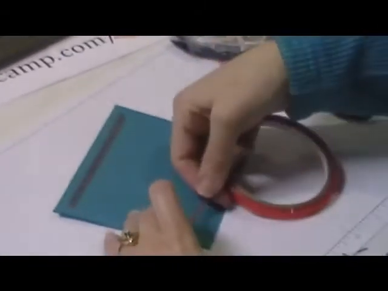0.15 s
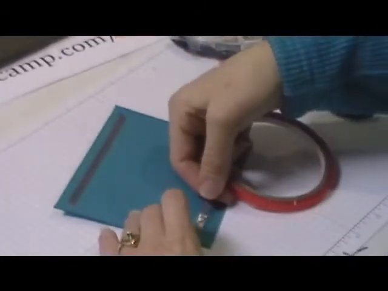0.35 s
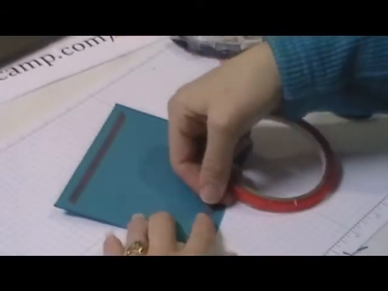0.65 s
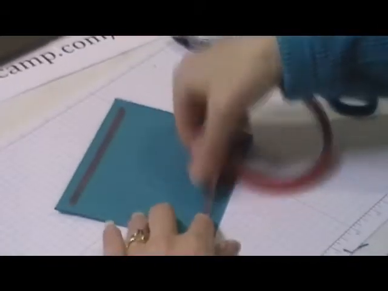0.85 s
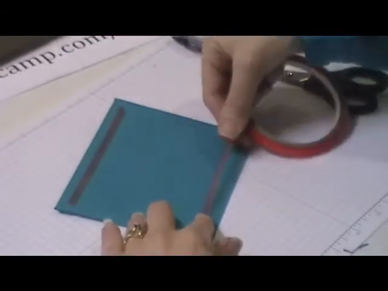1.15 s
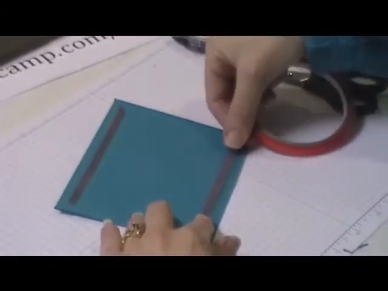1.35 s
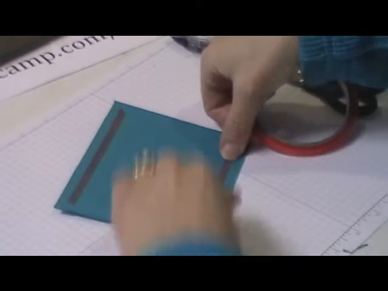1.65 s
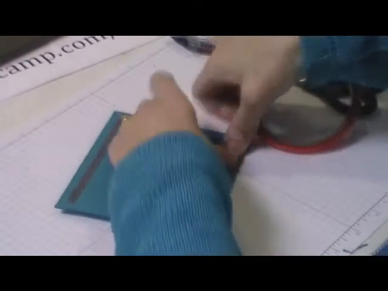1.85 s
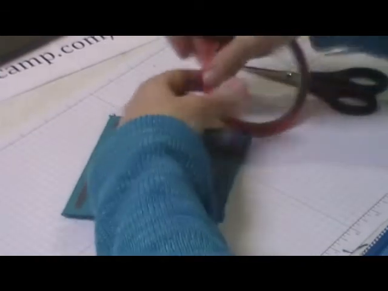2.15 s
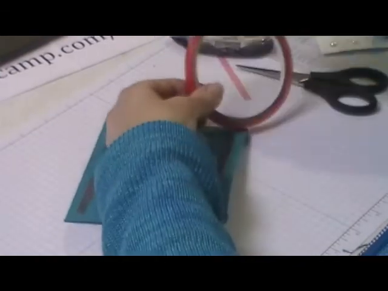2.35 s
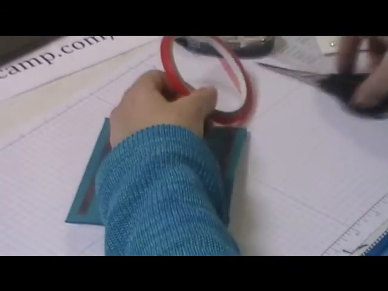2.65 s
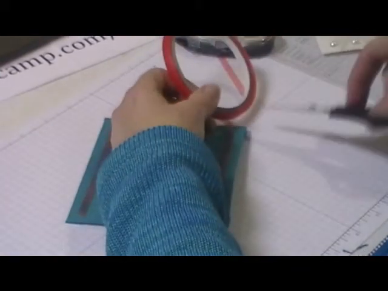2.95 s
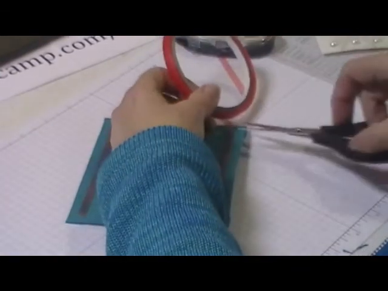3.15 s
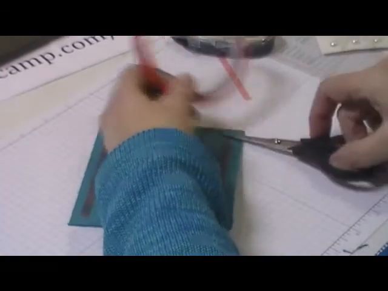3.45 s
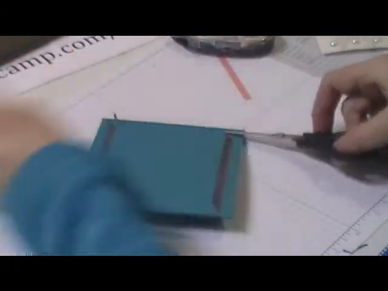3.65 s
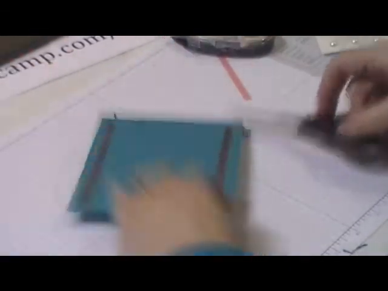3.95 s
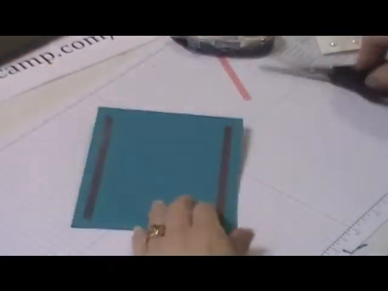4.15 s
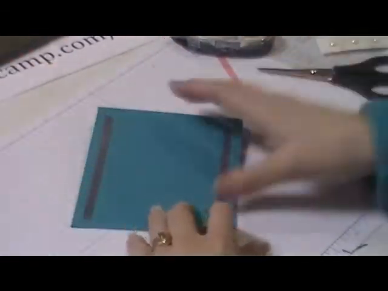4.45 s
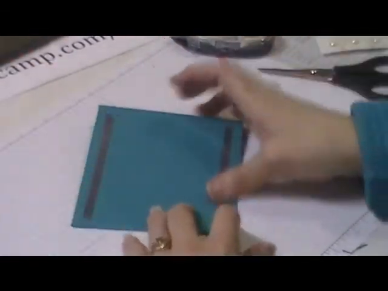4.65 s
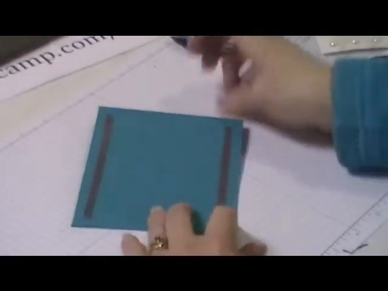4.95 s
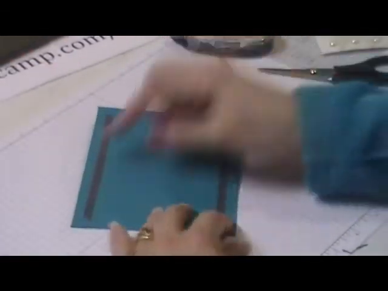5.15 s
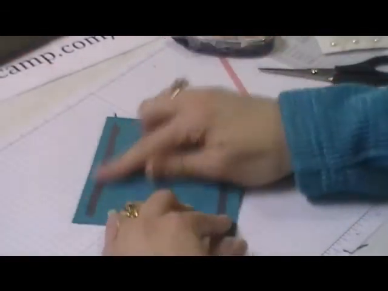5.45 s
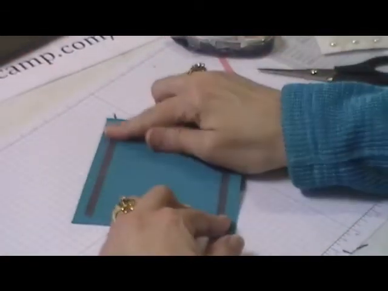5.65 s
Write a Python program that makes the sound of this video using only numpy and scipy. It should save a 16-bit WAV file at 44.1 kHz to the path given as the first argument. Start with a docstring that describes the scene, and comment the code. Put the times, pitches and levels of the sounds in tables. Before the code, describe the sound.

Hands work sticky tape on a card at a table: knocks, small snips, papery rubs, then a loud clatter as scissors are set down.

```python
"""Craft table, hands and adhesive strip

Place: a bare room with humming lamps, a faint whine and air hiss; hands lay adhesive strip on a card at a table.
Near the two capsules, a little to the right: roll and scissors knock damped table modes, and soft presses
strike the same modes. Strip and blades tick and scuff as noise bursts; fingers and sleeves swish and drag as
flickering noise with crackles. Further off, the room answers with decaying noise echoes.
The microphone notches out three narrow bands; the treble ends in a steep top cut."""
import sys
import numpy as np
from scipy import signal
from scipy.io import wavfile

SR = 44100
rng = np.random.default_rng(int(sys.argv[2]) if len(sys.argv) > 2 else 0)


def level_to_linear(level):
    """Convert decibel levels to linear amplitude factors, elementwise."""
    exponent = np.asarray(level, float) / 20
    return 10 ** exponent


def dump_mix(stems):
    """Bounce the given channels to the path in sys.argv[1] as a 16-bit WAV at rate SR."""
    frames = np.atleast_2d(stems).T  # one column per channel
    limited = np.clip(frames, -1, 1)  # hard clip at full scale
    pcm = np.round(limited * 32767).astype(np.int16)
    wavfile.write(sys.argv[1], SR, pcm)


N = 255780
BAND_EDGES_HZ = 30 * 2 ** np.arange(0, 9.1, .5)
RING_MIDDLE_HZ = 600


def rms_one(x):
    """Scale to an rms of 1."""
    return x / np.sqrt(np.mean(x ** 2) + 1e-20)


def at_hz(points, hz, column=1):
    """Read a table column at a frequency, straight between points on a log frequency axis."""
    table = np.array(points)
    return np.interp(np.log(hz), np.log(table[:, 0]), table[:, column])


def bands():
    """Half-octave band-passes with their centres."""
    for low, high in zip(BAND_EDGES_HZ, BAND_EDGES_HZ[1:]):
        yield np.sqrt(low * high), signal.butter(2, [low, high], "band", fs=SR, output="sos")


def drift(rate_hz):
    """Random wander of rms 1: noise through two equal low-pass poles, computed every 40 samples."""
    r = np.exp(-80 * np.pi * rate_hz / SR)
    noise = rng.standard_normal(N // 40 + 2002)
    slow = rms_one(signal.lfilter([1], [1, -2 * r, r * r], noise)[2000:])
    return np.interp(np.arange(N) / 40, np.arange(len(slow)), slow)


def pair(mid, side, alike):
    """Left and right from two signals with a given likeness."""
    alike = np.clip(alike, 0, 1)
    return np.sqrt((1 + alike) / 2) * mid + np.sqrt((1 - alike) / 2) * side * np.array([[1], [-1]])


def sides(pan_db):
    """Left and right gains; positive leans left."""
    return level_to_linear(np.multiply.outer([.5, -.5], pan_db))


def damped_resonance(hz, t60, blows):
    """A two-pole resonator: each impulse becomes a sine that dies 60 dB in t60 seconds."""
    r, w = level_to_linear(-60 / (t60 * SR)), 2 * np.pi * hz / SR
    return signal.lfilter([0, np.sin(w)], [1, -2 * r * np.cos(w), r * r], blows)


def burst(hz, spread, rise_ms, decay_ms):
    """A puff of noise around one pitch, the top of its envelope 60 ms in; peak 1."""
    ms = np.arange(4500) / SR * 1000 - 60
    rise = np.exp(-(ms / max(rise_ms, .05)) ** 2)
    decay = np.exp(-np.abs(ms) / max(decay_ms, .15))
    shape = np.where(ms < 0, rise, decay)
    first_touch = np.arange(len(ms)) == np.argmax(shape)
    grains = rng.standard_normal(len(ms)) + 2.5 / (1 + rise_ms) * first_touch   # first touch is the hardest
    spread = max(spread, 1.03)
    edges = np.clip([hz / spread, hz * spread], 300, 18000)
    puff = signal.sosfilt(signal.butter(2, edges, "band", fs=SR, output="sos"), grains * shape)
    return puff / np.abs(puff).max()


def add(out, s, sound):
    """Mix a burst in with the top of its envelope at s seconds."""
    at = round((s - .06) * SR)
    out[..., max(at, 0):at + sound.shape[-1]] += sound[..., max(-at, 0):N - at]


# room tone and hiss by frequency: f/Hz, relative level/dB per Hz
AIR_SPECTRUM = [(18, -38), (30, -18), (118, -3), (359, -6), (442, -10), (1340, -18), (1700, -20),
                (2500, -16.5), (2700, -20.5), (7030, -30), (11500, -42), (14500, -18)]
# how alike the two capsules hear the air: f/Hz, left-right likeness
AIR_LIKENESS = [(60, 0.092), (180, 0.019), (540, 0.022), (1610, 0.25), (4800, 0.93), (14400, 0.17)]
# lamp hum tones: f/Hz, rms level/dB, lead of the left capsule/turns
LAMP_HUM = [(45, -78, 0.13), (115.4, -72.5, 0.14), (256, -77, 0.3), (338, -74.5, 0.27), (620, -79, 0.73),
            (820, -78.5, 0.3), (1200, -83, 0.34), (1640, -81, 0.087)]
AIR_DB = -65.5
WHINE_HZ, WHINE_PEAK_DB = 11348, -93


def air():
    """Room tone and microphone hiss as banded noise, with wavering sines for the lamps and one steady whine."""
    white, hiss = rng.standard_normal((2, 2, N)), 0
    for k, (hz, sos) in enumerate(bands()):
        mid, side = signal.sosfilt(sos, white[k % 2])
        level = level_to_linear(at_hz(AIR_SPECTRUM, hz) + 0.25 * drift(3.7))
        hiss = hiss + level * pair(mid, side, at_hz(AIR_LIKENESS, hz))
    t, hum = np.arange(N) / SR, 0
    for hz, level_db, lead in LAMP_HUM:
        turns = hz * t + rng.random() + np.array([[lead], [0]])
        hum = hum + level_to_linear(level_db + 1.0 * drift(4.1)) * np.sqrt(2) * np.sin(2 * np.pi * turns)
    whine = level_to_linear(WHINE_PEAK_DB) * np.sin(2 * np.pi * WHINE_HZ * t)
    return level_to_linear(AIR_DB) * rms_one(hiss) + hum + whine


def friction(spectrum, tilt_db, patchy_db, grain_db):
    """Dense grains of uneven size through flickering bands; brought to rms near 1 before the tilt about 6 kHz."""
    grains = rng.standard_normal((2, N)) * level_to_linear(grain_db * drift(96))
    out, power, together = 0, 0, drift(16.0)
    for k, (hz, sos) in enumerate(bands()):
        if spectrum[0][0] < hz < spectrum[-1][0]:
            gain = level_to_linear(at_hz(spectrum, hz) + patchy_db * (together + drift(10.0)))
            band = gain * signal.sosfilt(sos, grains[k % 2])
            out = out + band * level_to_linear(tilt_db * np.log2(hz / 6000))
            power = power + np.mean(band ** 2)
    return out / np.sqrt(power)


CRACKLES_PER_S, CRACKLE_SPREAD_DB = 60, 3.5


def crackle():
    """Sparse snaps of paper and glue, each dying 60 dB within seven cycles of one of eight pitches."""
    sizes_db = CRACKLE_SPREAD_DB * np.minimum(rng.exponential(1, N), 3)
    snaps_at = rng.random(N) < CRACKLES_PER_S / SR
    sizes = level_to_linear(sizes_db) * snaps_at
    dealt, out = rng.integers(0, 8, N), 0
    for k, hz in enumerate(np.geomspace(800, 5000, num=8)):
        out = out + damped_resonance(hz, 7.0 / hz, sizes * (dealt == k) + 1e-18)
    return out


# skin and wool sliding: t/s, swish on paper level/dB, drag through the table level/dB
RUBBING = [(0.0, -59, -37.5), (0.3, -65, -64.5), (0.52, -72, -70.5), (0.97, -54, -57), (1.24, -58, -65.5),
           (1.322, -73.5, -64.5), (1.58, -70, -72), (1.71, -54.5, -50), (2.23, -57, -58.5), (2.4, -72, -69),
           (2.73, -56.5, -60), (3.0, -78.5, -68.5), (3.27, -76.5, -76), (3.33, -59, -61),
           (3.47, -53.5, -54.5), (3.56, -59.5, -58.5), (3.84, -62, -60.5), (4.05, -62, -50.5),
           (4.38, -55, -34), (4.54, -67, -53), (4.728, -52, -59.5), (4.899, -50.5, -52), (5.12, -59.5, -60),
           (5.389, -63, -60.5), (5.617, -47.5, -54), (5.8, -67, -59.5)]
# colour of the swish on paper: f/Hz, relative level/dB per Hz
SWISH_SPECTRUM = [(470, -82), (800, -25.5), (1350, -14), (2500, -9.5), (4080, -8.5), (5570, -10),
                  (6350, -7.5), (11300, -8), (14000, -3)]
# colour of the drag on the table: f/Hz, relative level/dB per Hz
DRAG_SPECTRUM = [(47, -63), (80, -31), (108, -7.5), (308, 4.5), (343, 3.5), (1930, -5.5), (2580, -13.5),
                 (3000, -11), (3900, -49), (6600, -120)]
SWISH_TILT_DB, TILT_PER_DB = -3.5, 0.3805   # dB per octave; brighter as the swish outweighs the drag
CRACKLE_DB = 4.5   # against the drag
JOLT_SWISH_DB, JOLT_DRAG_DB, JOLT_TILT_DB = -26.5, -12.5, -10   # dB against the ring (two), dB per octave
JOLT_REACH_OCTAVES = 1.77   # bright knocks shake out more swish


def rubbing():
    """Fingers and sleeves swish on paper, drag and crackle on the table; knocks jolt loose things into a slide."""
    s, *columns = np.transpose(RUBBING)
    swish_db, drag_db = [np.interp(np.arange(N) / SR, s, c) for c in columns]
    tilt_db = SWISH_TILT_DB + TILT_PER_DB * (swish_db - drag_db)
    swish = level_to_linear(swish_db) * friction(SWISH_SPECTRUM, tilt_db, patchy_db=1.3, grain_db=1.8)
    shaken = friction(SWISH_SPECTRUM, JOLT_TILT_DB, patchy_db=1.2, grain_db=3.0)
    shaken = level_to_linear(JOLT_SWISH_DB) * jolt(JOLT_REACH_OCTAVES) * shaken
    drag_level = np.hypot(level_to_linear(drag_db), level_to_linear(JOLT_DRAG_DB) * jolt(0))
    drag = drag_level * friction(DRAG_SPECTRUM, 0, patchy_db=3.0, grain_db=0.0)
    return swish + level_to_linear(drag_db + CRACKLE_DB) * crackle() + shaken + drag


# the bare room's echoes: f/Hz, t60/s, level/dB, left-right likeness
ROOM = [(71, 1, -21, 0.1), (130, 0.39, -5, 1), (270, 0.58, -3, 0.9), (1100, 0.55, -3.5, 0.46),
        (2000, 0.77, -7, 0.26), (3110, 0.54, -6, 0.87), (9000, 0.22, -11, 1)]


def room(x):
    """Echoes as noise that sets in after 3 ms, thickens over 4.8 ms and dies band by band."""
    t = np.arange(SR) / SR
    white, echoes = rng.standard_normal((2, 2, SR)), 0
    for k, (hz, sos) in enumerate(bands()):
        t60 = at_hz(ROOM, hz, column=1)
        mid, side = signal.sosfilt(sos, white[k % 2]) * level_to_linear(-60 * t / t60) / np.sqrt(t60 * SR / 14)
        echoes = echoes + level_to_linear(at_hz(ROOM, hz, column=2)) * pair(mid, side, at_hz(ROOM, hz, column=3))
    echoes = echoes * np.clip((t - .003) / 0.0048, 0, 1)
    return signal.fftconvolve(x[None], echoes, axes=1)[:, :N]


# roll and scissors striking the table, levels before colouring:
# t/s, click level/dB (2 dB is added), ring level/dB at the ring middle, ring tilt/dB per octave
KNOCKS = [(0.0054, -16.5, -32, 9.5), (0.053, -19, -62, 17.5), (0.469, -46, -61.5, 6.5),
          (0.6812, -42, -61, 3), (0.88, -28, -42, -7), (0.8836, -12.5, -31, 5), (0.905, -29, -41.5, 1),
          (0.915, -36, -39, -0.5), (0.9454, -35, -31, 0.5), (0.9566, -41, -47, -4),
          (0.9803, -22.5, -34.5, 4), (1.457, -61, -60, -2), (1.534, -46, -46.5, -2), (1.74, -25, -41, 5),
          (1.75, -50, -45, 6.5), (1.7989, -24.5, -52, -10), (1.9024, -45, -60, 7), (1.933, -47, -47.5, 1),
          (2.0692, -42, -47.5, -4), (2.144, -45, -48, -2), (2.3166, -56, -40, 0), (2.5648, -25.5, -32, 0),
          (2.578, -31, -28.5, 2.5), (2.588, -43, -31.5, 2.5), (2.594, -52, -32.5, 0.5),
          (2.599, -46, -41, 4), (2.6057, -48, -32.5, -4), (2.616, -48, -38, 5), (2.6935, -34, -31, -1),
          (2.706, -46, -33.5, -4), (2.7373, -40, -36.5, 4.5), (3.463, -43, -41.5, 4),
          (3.4977, -46, -58, 10.5), (3.6098, -49, -63.5, 14.5), (3.801, -49, -31.5, 0.5),
          (3.9603, -35, -38, 4), (3.9635, -38, -39, -0.5), (3.97, -47, -41, 5), (4.025, -50, -44.5, 7.5),
          (4.047, -39, -37.5, -2), (4.057, -34, -37.5, 2.5), (4.0603, -25.5, -42, 11.5),
          (4.083, -50, -42, -3), (4.2219, -13, -30, 7), (4.228, -32.5, -27, 6.5), (4.2407, -12, -26, 9),
          (4.2455, -30, -41, -4), (4.249, -25, -32, 4), (4.26, -12.5, -24, 3.5), (4.268, -29.5, -22.5, -2),
          (4.2742, -31.5, -28, 4.5), (4.284, -36, -29, -1.5), (4.298, -24, -28.5, 4.5),
          (4.313, -33, -29, 2), (4.375, -40, -25.5, 2.5), (4.386, -43, -28.5, -1.5), (5.167, -34.5, -51, 9),
          (5.2916, -30.5, -62.5, 12)]
# colour of plastic and steel edges: f/Hz, level/dB per Hz (half of it is applied)
CLICK_SPECTRUM = [(710, -43.5), (1200, 9.5), (4910, 5), (5550, -12), (6680, 6.5), (8910, -2.5), (12900, -2),
                  (14000, -59)]


def clicks():
    """The hard edge of each blow: noise decaying in half a millisecond, in the colour of plastic and steel."""
    out = np.full(N, 1e-18)
    for s, peak_db, *_ in KNOCKS:
        add(out, s, level_to_linear(peak_db + 2.0) * burst(5500, spread=2.05, rise_ms=0.026, decay_ms=0.51))
    return sum(level_to_linear(.5 * at_hz(CLICK_SPECTRUM, hz)) * signal.sosfilt(sos, out)
               for hz, sos in bands() if hz > 1000)


# modes of the table top: f/Hz, relative level/dB, t60/s (15 ms at least is played)
TABLE_TOP = [(98.5, 1, 0.023), (115.6, -4, 0.08), (158, -13, 0.059), (223, -1.5, 0.059), (286.5, -14, 0.15),
             (325.5, -7, 0.13), (381, -2.5, 0.059), (462.7, -5, 0.076), (568, -11, 0.053), (629, -6, 0.068),
             (700, -11, 0.067), (824, -3, 0.039), (936.4, -5, 0.062), (1047, -4, 0.032),
             (1152, -1.5, 0.023), (1390, -3, 0.014), (1526, -18, 0.012), (1723, -6, 0.032),
             (1920, -4.5, 0.023), (2010, -8.5, 0.011), (2680, -5, 0.0083), (3080, -4, 0.014),
             (3484, -13.5, 0.034), (3966, -7, 0.016), (4260, -9, 0.013)]
KNOCK_SPREAD_CYCLES, PRESS_SPREAD_S = 1.1, .022
KNOCK_BEND_DB, PRESS_BEND_DB = 2.5, 2.5   # loss per squared octave away from the middle
MODE_LEAN_DB = 3.5   # each ring of the wide table top leans left or right


def table_top():
    """Each blow strikes every mode afresh: a knock nearly at once, a press smeared over its soft contact."""
    rows = np.vstack([np.delete(KNOCKS, 1, axis=1), touches()])   # t/s, ring level/dB, tilt/dB per octave
    soft, out = np.arange(len(rows)) >= len(KNOCKS), np.zeros((2, N))
    scatter_db = rng.normal(0, 1.5, (len(rows), len(TABLE_TOP)))
    lag = rng.random(scatter_db.shape)
    signs = rng.choice([-1, 1], scatter_db.shape)
    lean = sides(rng.normal(0, MODE_LEAN_DB, scatter_db.shape))
    for k, (hz, level_db, t60) in enumerate(TABLE_TOP):
        blows = np.full((2, N), 1e-18)
        contact_s = np.where(soft, PRESS_SPREAD_S, KNOCK_SPREAD_CYCLES / hz)
        at = ((rows[:, 0] + lag[:, k] * contact_s) * SR).astype(int)
        octaves = np.log2(hz / RING_MIDDLE_HZ)
        bend_db = np.where(soft, PRESS_BEND_DB, KNOCK_BEND_DB) * octaves ** 2
        strength_db = rows[:, 1] + rows[:, 2] * octaves - bend_db
        blows[:, at] = lean[:, :, k] * signs[:, k] * level_to_linear(strength_db + level_db + scatter_db[:, k])
        out += damped_resonance(hz, max(t60, .015), blows)
    return out


def jolt(octaves):
    """Envelope dying 60 dB in 0.45 s after each knock, by the strength of its ring that far above the middle."""
    kicks = np.full(N, 1e-18)
    for s, _, ring_db, tilt_db in KNOCKS:
        kicks[round(s * SR)] = level_to_linear(2 * (ring_db + tilt_db * octaves))   # power
    return np.sqrt(signal.lfilter([1], [1, -level_to_linear(-120 / (0.45 * SR))], kicks))


# blows that set one resonance of table, roll or handle ringing above the rest:
# t/s, f/Hz, level/dB before rise and decay, t60/s
HOLLOW_RINGS = [(.02, 398, -33.5, 0.2), (.888, 329, -32.5, 0.23), (0.906, 950, -33, 0.16),
                (0.9465, 1003, -32.5, .1), (.955, 746, -38, 0.076), (0.984, 326, -38, 0.1),
                (1.172, 820, -48.5, 0.12), (1.534, 801.4, -36.5, 0.044), (2.582, 948, -28.5, 0.16),
                (2.606, 200, -36.5, 0.097), (2.632, 320, -31, 0.16), (2.735, 319.7, -31.5, 0.17),
                (2.79, 284, -32, .1), (3.459, 124.5, -45, 0.16), (3.801, 1260, -30.5, 0.039),
                (3.801, 153.6, -32, 0.17), (3.96, 1048, -31, 0.079), (4.223, 1053, -21, 0.047),
                (4.262, 213, -27.5, 0.16), (4.272, 650, -21, 0.067), (4.314, 319, -29, 0.17),
                (4.376, 996, -20.5, 0.043), (4.388, 292, -23.5, 0.088), (4.452, 320.6, -30.5, 0.14),
                (4.763, 219, -39.5, 0.14), (4.963, 124.9, -35.5, 0.21), (4.965, 407, -36, 0.064),
                (5.005, 260, -37.5, 0.092), (5.518, 132.6, -36.5, 0.31), (5.553, 207.5, -34, 0.15),
                (5.64, 209.9, -41.5, 0.26), (5.79, 208, -36, 0.089)]
HOLLOW_RISE_CYCLES = 0.57


def hollow_rings():
    """One damped tone per blow, swelling over the contact."""
    out, t = np.zeros(N + SR), np.arange(SR // 2) / SR
    for (s, hz, level_db, t60), sign in zip(HOLLOW_RINGS, rng.choice([-1, 1], len(HOLLOW_RINGS))):
        rise = 1 - np.exp(-t * hz / HOLLOW_RISE_CYCLES)
        decay = level_to_linear(level_db - 60 * t / t60)
        at = round(s * SR)
        out[at:at + len(t)] += sign * rise * decay * np.sin(2 * np.pi * hz * t)
    return out[:N]


# hands pressing and objects settling, runs of touches too soft to click:
# t/s, length/s, first touch level/dB at the ring middle, tilt/dB per octave, loss/dB per touch
PRESSES = [(0.03, 0.099, -34, 0, 12), (0.769, 0.021, -49, 0, 2), (0.884, 0.1, -39.5, 1, 0),
           (1.172, .1, -50.5, 2, 3), (1.539, 0.092, -41.5, -5.5, 2.5), (1.768, 0.012, -48, -4, 0),
           (1.901, 0.0026, -60, -11, 2.5), (1.929, 0.28, -52, 5, 0), (2.326, 0.043, -40.5, -0.5, 8.5),
           (2.631, 0.037, -43, -7, 1), (2.718, 0.055, -38.5, -4.5, 1.5), (3.461, 0, -57, -12, 0),
           (3.469, 0.019, -46, 2, 0), (3.802, 0.11, -34, -5, 2), (3.976, 0.033, -48, -7, -1),
           (4.084, 0.011, -53, 4, 0), (4.243, 0.13, -37, -4, 0.5), (4.387, 0.091, -31.5, 4, 2),
           (4.701, 0.02, -44, -1, 0), (4.957, 0.045, -39.5, -4, 7), (5.294, 0.015, -63.5, -15, 0),
           (5.507, 0.09, -41, -6, 0.5)]
TOUCH_GAP_S, TOUCH_JITTER = .02, .3   # jitter as a share of the gap


def touches():
    """Every touch of every press, 20 ms apart with jitter: t/s, level/dB, tilt/dB per octave."""
    rows = []
    for s, length, level_db, tilt_db, loss_db in PRESSES:
        for n in range(16):
            if n * TOUCH_GAP_S <= length:
                jitter = TOUCH_JITTER * rng.uniform(-0.99, 1) * (n > 0)
                rows.append((s + TOUCH_GAP_S * (n + jitter), level_db - loss_db * n, tilt_db))
    return np.array(rows)


# glue letting go and blades meeting: t/s, peak level/dB, f/Hz, decay/ms (0.15 ms at least is played)
TICKS = [(0.296, -52.5, 6500, 2), (0.361, -43.5, 11100, 0.78), (1.354, -51, 11100, 1.5),
         (1.535, -30.5, 8000, 2.5), (1.543, -34, 9500, 2.22), (1.561, -36.5, 7000, 2),
         (1.862, -29.5, 6500, 1.7), (3.453, -33, 7000, 6.1), (3.462, -22, 4700, 0.6),
         (3.4619, -16, 3900, 0.12), (3.497, -31, 11000, 1.45), (3.546, -44, 9955, 1.33),
         (3.609, -29.5, 4150, 2.4), (3.723, -34.5, 7100, 16.6), (4.0265, -32.5, 3550, 2),
         (4.044, -35, 8000, 6.1), (4.559, -32.5, 9830, 1.1), (4.96, -26.5, 9000, 4),
         (5.086, -27, 8020, 0.45), (5.416, -40, 2570, 2.5)]
# strip, card and blades scuffing: t/s, peak level/dB, f/Hz, spread factor (1.03 at least is played), decay/ms
SCUFFS = [(0.786, -43, 5870, 4, 47), (1.091, -47, 4410, 1.46, 21), (1.69, -43, 2994, 0.95, 18),
          (1.755, -45, 3600, 1.3, 18.7), (1.8, -40, 3500, 1.7, 25), (1.94, -45.5, 3000, 3, 18),
          (2.099, -44.5, 4500, 2.2, 39), (2.151, -50.5, 1500, 1.54, 17), (1.69, -42, 3770, 1.9, 25),
          (1.69, -36, 2260, 1.57, 9.8), (2.27, -49, 5150, 2.6, 6.7), (2.357, -40, 9000, 1.84, 13),
          (2.4, -48.5, 5940, 2.3, 20), (3.049, -52, 10800, 1.27, 4.8), (3.346, -41.5, 7960, 3.2, 19),
          (3.424, -35.5, 8040, 3.4, 6.9), (3.596, -41, 9900, 3, 19.6), (3.61, -32, 2000, 1.27, 1.35),
          (3.628, -48, 2110, 1.12, 10), (3.971, -41.5, 4900, 2.073, 17.5), (4.18, -41, 10300, 2.36, 26),
          (4.714, -46.5, 1400, 1.12, 28), (4.951, -33, 6940, 4.6, 26.5), (5.31, -46.5, 7080, 3.5, 15),
          (5.438, -51, 9940, 2.87, 22), (5.511, -33, 6718, 4.78, 35.7), (5.794, -34.5, 7790, 4.13, 21)]
TICK_RISE_SHARE, TICK_RISE_MAX_MS, TICK_SPREAD = 0.04, 0.36, 2.33   # rise over decay time, its ceiling
SCUFF_RISE_SHARE = 1.18   # rise time over decay time


def snaps():
    """Glue letting go, card flexing and blades closing: noise bursts, sudden for ticks and swelling for scuffs."""
    out = np.zeros(N)
    for s, peak_db, hz, decay_ms in TICKS:
        rise_ms = min(TICK_RISE_SHARE * decay_ms, TICK_RISE_MAX_MS)
        add(out, s, level_to_linear(peak_db) * burst(hz, TICK_SPREAD, rise_ms, decay_ms))
    for s, peak_db, hz, spread, decay_ms in SCUFFS:
        add(out, s, level_to_linear(peak_db) * burst(hz, spread, SCUFF_RISE_SHARE * decay_ms, decay_ms))
    return out


WORK_PAN_DB, CAPSULE_LAG_SAMPLES = -0.63, 0.28   # the work lies a little to the right
RUBBING_LIKENESS = 0.99   # two hands rub in two places
LOW_CUT_HZ = 109.5   # low cut of the microphone, applied to the work and its echoes


def scene():
    """The work near the capsules, the room's answer to it, and the air."""
    rubs = rubbing()
    hands = pair(rubs, np.roll(rubs, shift=SR // 50), RUBBING_LIKENESS)
    near = table_top() + clicks() + snaps() + hollow_rings() + hands
    near = near * sides(np.array([WORK_PAN_DB]))
    # the slope of the wave shifts it slightly: later on the left, earlier on the right
    near = near + CAPSULE_LAG_SAMPLES / 2 * np.gradient(near, axis=1) * [[-1], [1]]
    heard = near + room(near.mean(axis=0))
    low_cut = signal.butter(4, LOW_CUT_HZ, "high", fs=SR, output="sos")
    return signal.sosfilt(low_cut, heard) + air()


def band_limit(x):
    """A steep low-pass at the top of the band."""
    return signal.sosfilt(signal.butter(12, 14970, fs=SR, output="sos"), x)


# centres of the microphone's notches: f/Hz
NOTCH_HZ = [2540, 5760, 7270]
# their shapes in the same order: width/Hz, level/dB at the centre
NOTCH_SHAPE = [(220, -13), (360, -30), (280, -24)]
TOP_CUT_HZ = 13700


def record(dry):
    """A steep top cut, then the microphone's narrow notches, made by subtracting most of each resonance."""
    x = signal.sosfilt(signal.cheby2(16, 50, TOP_CUT_HZ, fs=SR, output="sos"), dry)
    for hz, (width_hz, depth_db) in zip(NOTCH_HZ, NOTCH_SHAPE):
        resonance = signal.lfilter(*signal.iirpeak(hz, hz / width_hz, SR), x)
        x = x + (level_to_linear(depth_db) - 1) * resonance
    return band_limit(x)


dry = scene()
out = record(dry)
dump_mix(out)
```